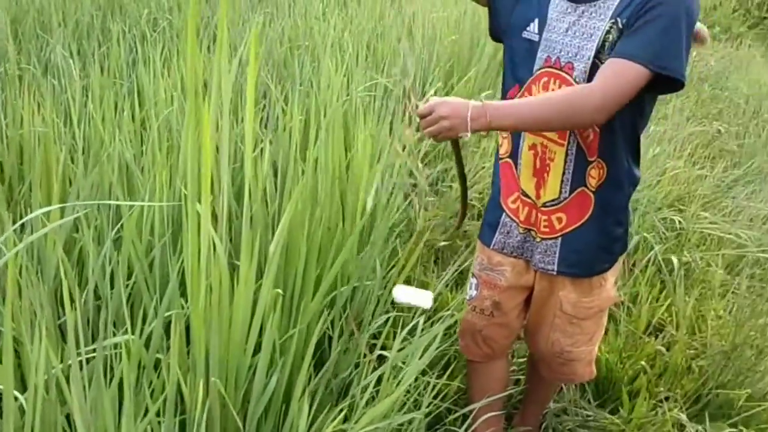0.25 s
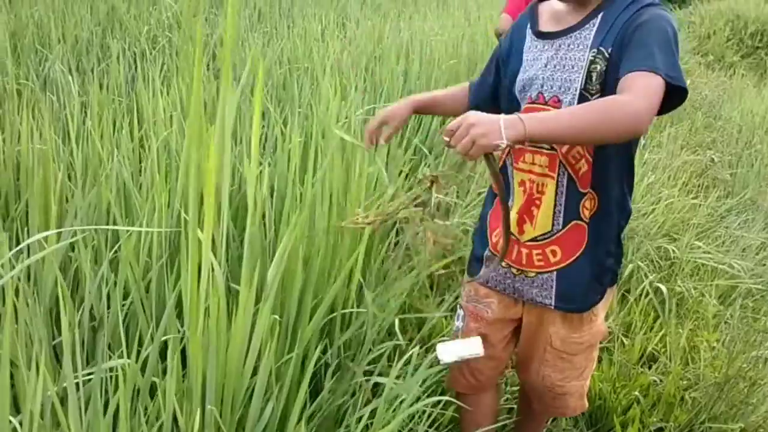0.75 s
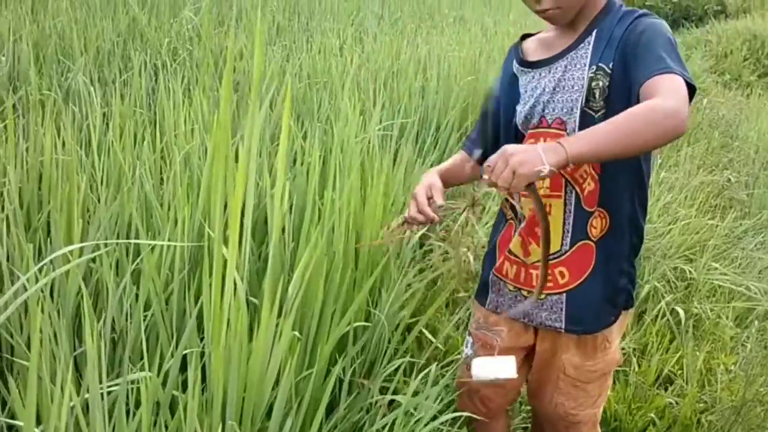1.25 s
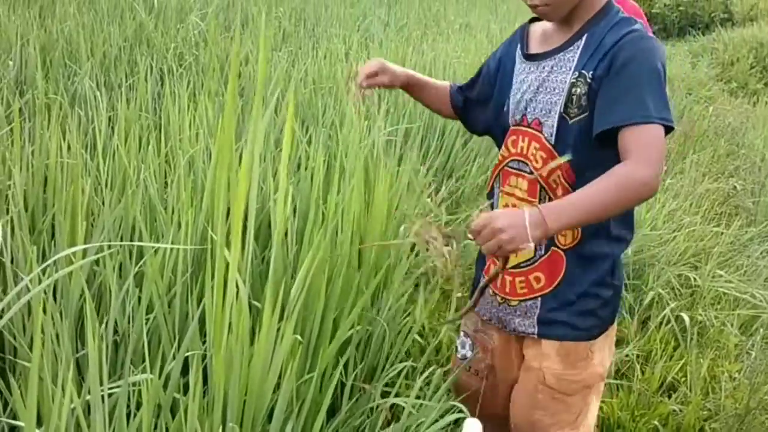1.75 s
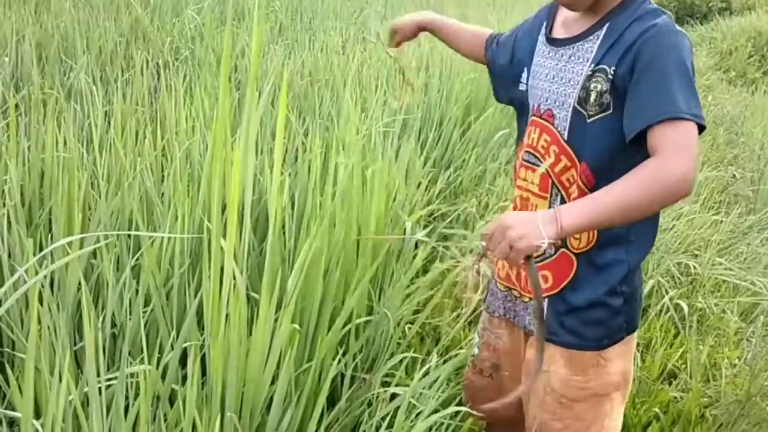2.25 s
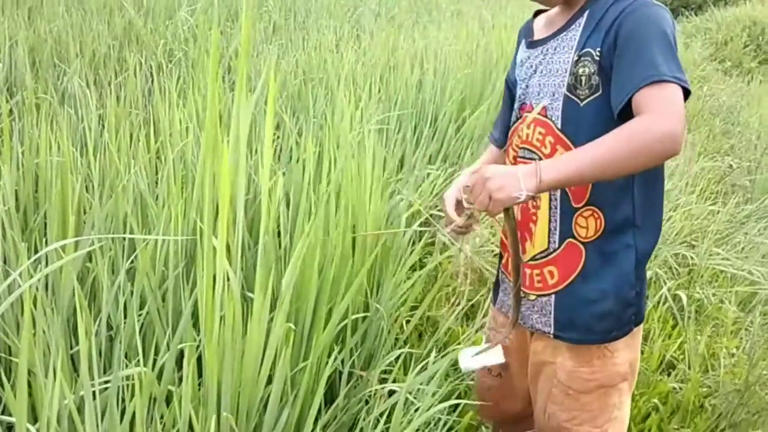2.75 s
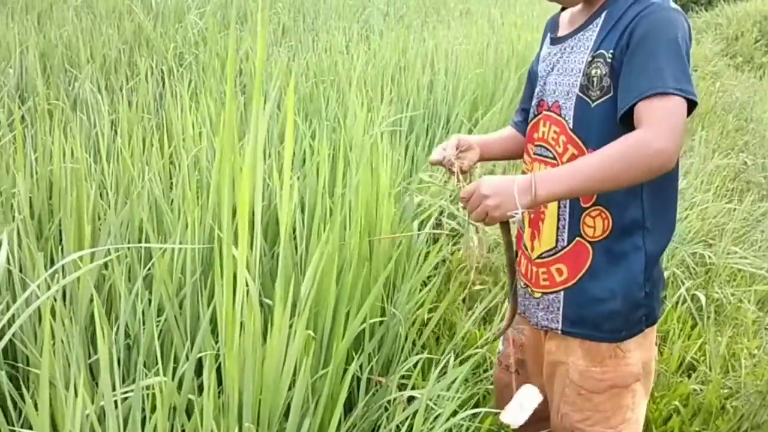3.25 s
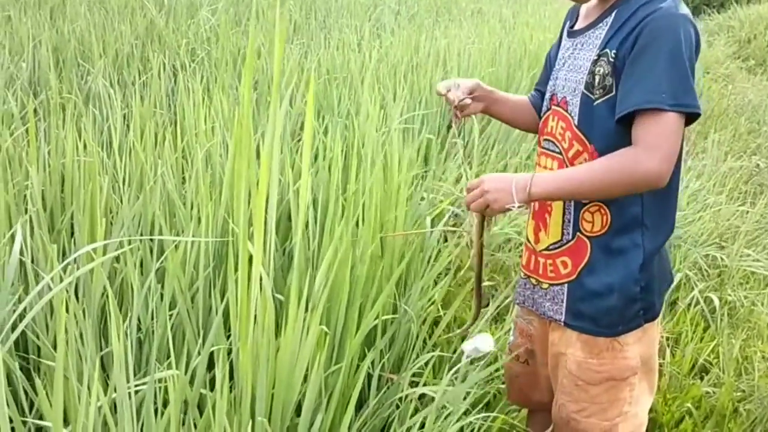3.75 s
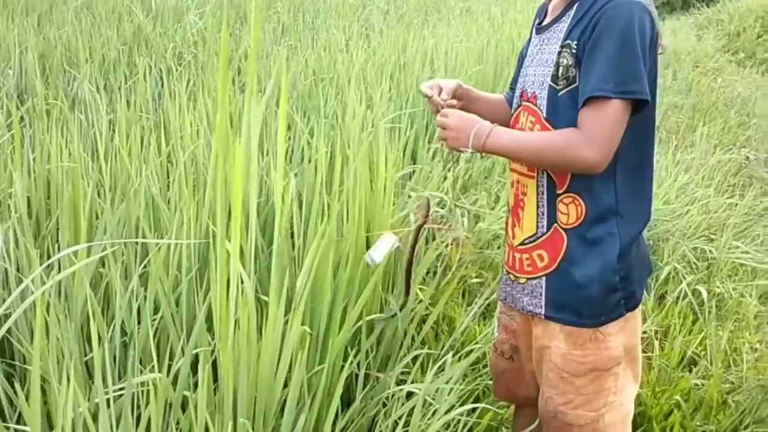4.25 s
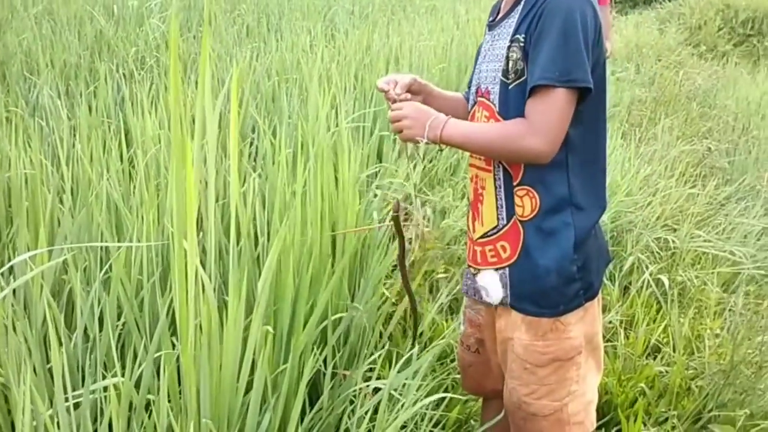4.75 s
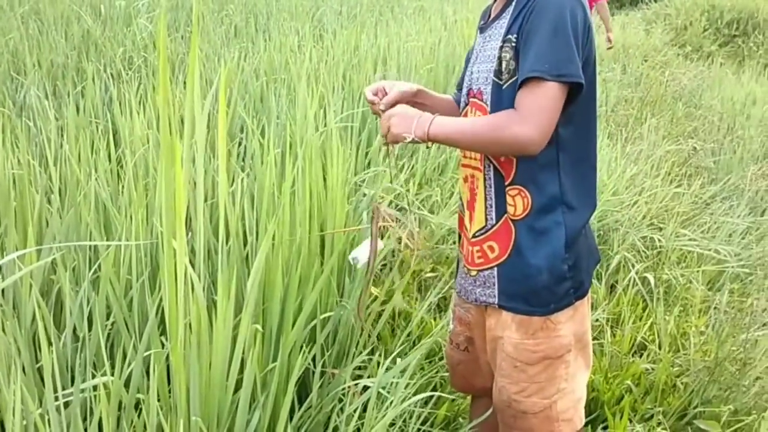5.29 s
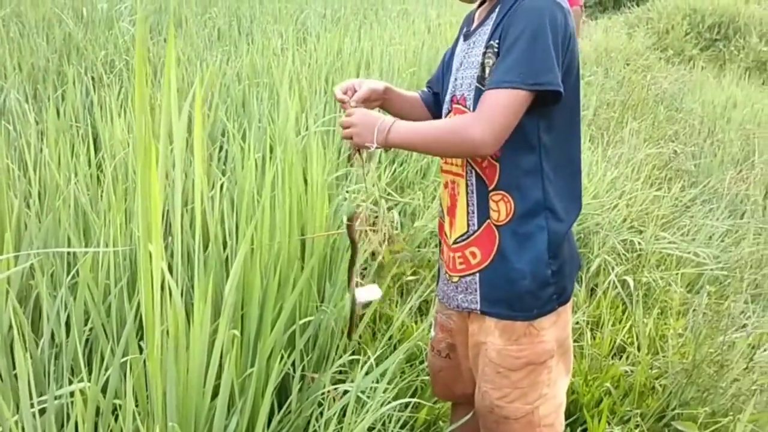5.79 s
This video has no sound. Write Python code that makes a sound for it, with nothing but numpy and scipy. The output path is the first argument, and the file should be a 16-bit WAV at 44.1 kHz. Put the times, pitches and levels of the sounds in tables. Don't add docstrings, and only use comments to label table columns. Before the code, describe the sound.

Throughout six seconds, an open grassy field rings with very high cicada whistles near 11 to 12 kilohertz, over weak tones near 3 kilohertz. Overlapping phrases of roughly a second sag slightly and renew, shimmering in level above a blurred far chorus. One katydid swells from the start into a dry buzz of about a hundred strokes a second, stopping near 3.4, then slowly rising again from 3.55. A brighter, stronger one buzzes from 0.5 to 1.45 and from 3.9 to 5.9. Faint crickets purr low and flutter. Hands softly brush grass around 0.5, 1.0 and 1.7, with the clearest swipe at 2.07, fading by 2.5. A quick warbler flicks at 2.85, repeats louder at 5.07, then gives a bent call until 5.4. Thin peeps, gradually lower, repeat from 4.9 onward. Quiet breeze, distant rumble and steady hiss lie beneath.

```python
import sys
import numpy as np
from scipy import signal
from scipy.fft import rfft, irfft, next_fast_len
from scipy.io import wavfile
from scipy.ndimage import uniform_filter1d, map_coordinates

SR = 44100
rng = np.random.default_rng(int(sys.argv[2]) if len(sys.argv) > 2 else 0)


def invert_db(x):
    u = np.asarray(x, float) / 20
    return 10 ** u


def wav_out(sig):
    wavfile.write(sys.argv[1], SR, np.round(np.clip(np.atleast_2d(sig).T, -1, 1) * 32767).astype(np.int16))


N = 265729
TIME = np.arange(N) / SR


def unit(x):
    return x / np.sqrt(np.mean(x ** 2) + 1e-20)


def curves(rows, t=TIME):
    s, *cols = np.transpose(rows)
    return [np.interp(t, s, c) for c in cols]


def wobble(rate, size=N):
    knots = rng.standard_normal(int(size * rate / SR) + 4)
    return map_coordinates(knots, [np.arange(size) * rate / SR])


def filtered(x, response):
    m = next_fast_len(N + 8192)
    return irfft(rfft(x, m) * response(np.fft.rfftfreq(m, 1 / SR)), m)[:N]


def noise(spectrum):
    f, db = np.transpose(spectrum)
    colour = lambda hz: invert_db(np.interp(np.log(hz + 1), np.log(f + 1), db))
    return unit(filtered(rng.standard_normal(N), colour))


def add(out, s, piece):
    part = out[round(s * SR):][:len(piece)]
    part += piece[:len(part)]


def whistle(hz, db):
    cycles = np.cumsum(hz) / SR + rng.random()
    return np.sqrt(2) * invert_db(db) * np.sin(2 * np.pi * cycles)


def echoes(x, wet_db, t60):
    t = np.arange(SR // 4) / SR
    tail = rng.standard_normal(len(t)) * invert_db(-60 * t / t60) * (t > .002)
    return x + invert_db(wet_db) * signal.fftconvolve(x, tail / np.linalg.norm(tail))[:N]


def cicadas(phrases, trim_db, flutter_db, waver_hz):
    out = np.zeros(N)
    for s, length, hz, sag_hz, early_db, late_db in phrases:
        u = np.linspace(0, 1, round(length * SR))
        swell_db = early_db + (late_db - early_db) * (2 * u - .5)
        swell_db = np.clip(swell_db, min(early_db, late_db) - 3, max(early_db, late_db) + 9.0)
        flutter = wobble(6.3, size=len(u)) + 0.87 * wobble(30.0, size=len(u))
        level_db = swell_db + trim_db + flutter_db * flutter
        nearest_end = np.minimum(u + (s < .05), 1 - u + (s + length > 6))
        fade = np.clip(nearest_end * length / 0.042, 0, 1)
        pitch_hz = hz - sag_hz * u + waver_hz * wobble(25.2, size=len(u))
        add(out, s, fade * whistle(pitch_hz, level_db))
    return out


def partial_phrases(singer, partial, db, swell_db):
    breath_s = .07
    first, period, hz, sag_hz, share = singer
    rows = []
    for start in np.arange(first, N / SR, period):
        s = max(start + breath_s, 0)
        end = start + share * period
        if end > s + .02:
            start_hz = partial * (hz - sag_hz * (s - start))
            fall_hz = partial * sag_hz * (end - s)
            rows.append((s, end - s, start_hz, fall_hz, db - swell_db, db + swell_db))
    return rows


def near_chorus():
    # first_start_s, phrase_period_s, start_hz, sag_hz_per_s, sung_share
    near_singers = [(-.246, .829, 2879.4, 25.3, .97), (-.652, 1.044, 2847.3, 16.5, .98),
                    (-.217, .768, 2840.9, 21.3, .95), (-.66, .808, 2901.4, 35, .68),
                    (-.468, 1.053, 2956.7, 20.8, .93), (-.637, .817, 2796.3, 22.1, .92),
                    (-.191, .832, 2959.1, 25.2, .82), (-.199, .84, 2916.2, 22, .7),
                    (-.137, .91, 2746.1, 26.6, .75), (-.243, .826, 3041.8, 24.4, .92),
                    (-.637, .962, 2779.8, 18.2, .7)]
    # fourth_partial_db, fourth_swell_db, fundamental_db, fundamental_swell_db (swell per phrase)
    voices = [(-52.5, 2, -71, -3), (-58.5, 0, -70, 0), (-56.5, -2.5, -70, -1), (-63, 3, -70, -2),
              (-68, -1, -70, -.5), (-64, -1, -82, -3), (-66, -1, -84, 0), (-70, -1, -88, 0),
              (-76, 2, -79.5, 0), (-73, 1, -90, 0), (-79, -2, -82, 0)]
    # time_s, fourth partials of the three nearest (gain_db x 3), all fundamentals gain_db
    shimmer = [(0, 8, 8, 1, 2), (.4, -3.5, -1, 2, -0.5), (.8, -1, 3, 0.5, -1.5), (1.2, 0.5, -1, 1, -.5),
               (1.7, 2, 7, 1.5, -1.5), (2.1, -3, 1, 1, -2), (2.5, 1, 0.1, 3, -1.5), (2.95, -3, 4, 7.5, 0.5),
               (3.3, -4, -7, 8, -0.5), (3.7, -3, -0.5, 2, 4), (4.2, -1, 0, -5, -1), (4.7, -9, 5, 1.5, 2),
               (5.1, 4, 5, -3, 1.5), (5.5, -7.5, 2, 1, -0.3), (6.03, 5, 1, -14, 2)]
    *fades, low_fade_db = curves(shimmer)
    fades = fades + [0] * len(near_singers)
    octave_db = -30
    octave = partial_phrases(near_singers[0], 2, voices[0][0] + octave_db, 0)
    out = cicadas(octave, trim_db=0, flutter_db=1.8, waver_hz=2)
    for singer, voice, fade_db in zip(near_singers, voices, fades):
        high_db, high_swell_db, low_db, low_swell_db = voice
        high = partial_phrases(singer, 4, high_db, high_swell_db)
        out = out + invert_db(fade_db) * cicadas(high, trim_db=0, flutter_db=2.5, waver_hz=2.5)
        low = partial_phrases(singer, 1, low_db, low_swell_db)
        out = out + invert_db(low_fade_db) * cicadas(low, trim_db=0, flutter_db=1.4, waver_hz=.8)
    return out


def far_chorus():
    # first_start_s, phrase_period_s, start_hz, level_db
    far_singers = [(-.063, .827, 12095, -77), (.1, .9, 11930, -73), (-.3, .8, 11700, -73),
                   (-.1, .87, 11050, -77), (.3, .76, 11270, -69)]
    # centre_hz, width_hz, level_db
    crowd_bands = [(11170, 160, -8), (11400, 300, 0), (11700, 300, -7), (12000, 400, -14),
                   (10940, 200, -14)]
    rows = []
    for first, period, hz, db in far_singers:
        for s in np.arange(first, 6, period):
            if s >= 0:
                rows.append((s, 1.1 * period, hz, 0.0066 * hz, db, db))

    def bands(f):
        return np.sqrt(sum(invert_db(2 * db) / (1 + (2 * (f - c) / w) ** 4) for c, w, db in crowd_bands))

    crowd = invert_db(-63 + 1.5 * wobble(3)) * unit(filtered(rng.standard_normal(N), bands))
    return crowd + cicadas(rows, trim_db=-1.5, flutter_db=2.2, waver_hz=3)


def strokes(song, duty, sweep, octave_db, scatter_db, rasp, lead=0.0, point=2):
    rate, hz, db = curves(song)
    begun = TIME >= song[0][0]
    turns = np.cumsum(rate * begun) / SR + lead
    number = turns.astype(int)
    u = (turns - number) / np.clip(duty, .05, 1)
    through = np.clip(u, 0, 1)
    size_db, bend, start = rng.standard_normal((number[-1] + 1, 3))[number].T
    shape = np.sin(np.pi * through ** 0.64) ** point * begun * (TIME <= song[-1][0])
    chirp_hz = hz * (1 + sweep * (.4 - through) + .006 * bend)
    phase = 2 * np.pi * np.cumsum(chirp_hz) / SR + 2 * start
    rough = 1 + rasp * wobble(900)
    tone = np.sin(phase) + invert_db(octave_db) * np.sin(2 * phase)
    return shape * rough * tone * invert_db(db + scatter_db * size_db) * 2 / np.sqrt(duty)


def pitched(song, hz, at_db, hz_per_db):
    return [(s, rate, hz + hz_per_db * (db - at_db), db) for s, rate, db in song]


def katydids():
    # time_s, strokes_per_s, level_db
    left_song = [
        [(-.1, 106, -63.5), (.3, 99, -55.5), (.6, 105, -54), (1.0, 102, -52), (1.5, 103, -52), (2.5, 100, -53),
         (3.424, 96.5, -52.5)],
        [(3.55, 99, -62.5), (3.8, 110, -59), (4.2, 102, -58), (4.7, 99.3, -55.5), (5.7, 98.8, -50.5),
         (6.1, 103, -54.5)],
    ]
    right_song = [
        [(.48, 103.7, -60), (.72, 102.4, -50), (.78, 104.6, -47.5), (1.2, 103, -47), (1.455, 101.3, -46.5)],
        [(3.9, 102, -61), (3.96, 101.5, -52.5), (4.11, 103.4, -52.5), (4.15, 104.3, -47), (5.0, 102.5, -46.5),
         (5.88, 102, -47.5)],
    ]
    left_octaves_db = (-4, -7)
    left = sum(strokes(pitched(song, 7672, at_db=-53.5, hz_per_db=13), duty=.68, sweep=.16, octave_db=db,
                       scatter_db=-0.04, rasp=0.077, lead=.68, point=1.43)
               for song, db in zip(left_song, left_octaves_db))
    right = sum(strokes(pitched(song, 8228, at_db=-47, hz_per_db=30), duty=.62, sweep=.06, octave_db=-24,
                        scatter_db=1.1, rasp=.1, lead=.65, point=1.7)
                for song in right_song)
    return echoes(left, wet_db=-9, t60=.05) + echoes(right, wet_db=-11, t60=0.045)


def steady(rate, hz, db):
    return [(0, rate, hz, db), (6.1, rate, hz, db)]


def crickets():
    # time_s, level_db
    purr_levels = [(0, -63), (.8, -70.5), (1.3, -65.5), (1.6, -67.5), (2.1, -62), (2.8, -67), (3.5, -62),
                   (4.3, -68), (5.2, -61), (6.1, -66)]
    # time_s, level_db
    buzz_levels = [(0, -67), (1.5, -69), (3, -68), (4.7, -66), (5.1, -69), (6.1, -71)]
    purr_db, = curves(purr_levels)
    purr = sum(strokes(steady(*voice), duty=.7, sweep=.17, octave_db=-40, scatter_db=1.5,
                       rasp=.1, lead=.1, point=1.3)
               for voice in [(25.62, 3330, 0), (26.25, 3370, -7), (17.0, 3280, -4)])  # strokes/s, Hz, dB
    buzz_db, = curves(buzz_levels)
    bursts = np.clip(.35 + 1.5 * np.sin(2 * np.pi * (8.5 * TIME + .01)), .2, 1)
    buzz = strokes(steady(95, 6620, 0), duty=.9, sweep=.03, octave_db=-40, scatter_db=2.5, rasp=.15, point=1.2)
    both = invert_db(purr_db - 5) * purr + invert_db(buzz_db + 2.5) * bursts * buzz
    return echoes(both, wet_db=-5, t60=.08)


def birds():
    # start_s, pitch_factor, level_db
    figures = [
        (2.854, .975, -51),
        (5.068, .99, -45.5),
    ]
    # time_from_figure_start_s, pitch_hz, level_db
    humps = [(0, 4300, -20), (.012, 6200, -3), (.023, 6900, -7), (.031, 6500, -5), (.035, 5700, -6),
             (.042, 5800, -5), (.047, 6750, -7), (.054, 6200, -9), (.061, 4400, -22)]
    flick = [(.07, 4500, -26), (.073, 5050, -9), (.077, 5150, -9), (.083, 4300, -20), (.086, 5700, -12),
             (.09, 5000, -9), (.099, 3400, -14)]
    # time_s, pitch_hz, level_db
    kinked_fall = [(5.258, 7100, -73), (5.268, 6880, -56), (5.279, 6100, -52), (5.286, 6700, -54),
                   (5.294, 6300, -51), (5.301, 5500, -51), (5.305, 5430, -70)]
    final_dip = [(5.308, 6300, -66), (5.318, 6000, -51), (5.331, 5680, -48.5), (5.345, 5530, -54),
                 (5.36, 5720, -50.5), (5.372, 6000, -53), (5.382, 6440, -54), (5.39, 6600, -80)]
    # start_s, length_s, top_hz, level_db
    peeps = [
        (4.905, .062, 6650, -65),
        (5.03, .07, 6600, -61),
        (5.16, .07, 6420, -63),
        (5.298, .07, 6400, -69),
        (5.435, .074, 6310, -60.5),
        (5.578, .082, 6250, -60),
        (5.735, .072, 6160, -62),
        (5.893, .078, 6140, -66),
    ]
    # share_of_length, pitch_factor, level_db
    peep_arch = [(0, .92, -16), (.08, .968, -5), (.3, .985, 0), (.7, 1.0, 0), (.88, .99, -2),
                 (1.0, .87, -12)]
    out = np.zeros(N)
    notes = [(note, s, factor, db) for s, factor, db in figures for note in (humps, flick)]
    notes += [(kinked_fall, 0, 1, 0), (final_dip, 0, 1, 0)]
    for note, s, factor, db in notes:
        hz, shape_db = curves(note, np.arange(note[0][0], note[-1][0], 1 / SR))
        add(out, s + note[0][0], whistle(factor * uniform_filter1d(hz, size=70), db + shape_db))
    for s, length, hz, db in peeps:
        factor, shape_db = curves(peep_arch, np.linspace(0, 1, round(length * SR)))
        add(out, s, whistle(hz * uniform_filter1d(factor, size=200), db + shape_db))
    return echoes(out, wet_db=-6, t60=.15)


def grass():
    # centre_s, level_db, half_length_s
    brushes = [
        (.47, -61.5, .14),
        (1.0, -64.5, .35),
        (1.65, -64, .2),
        (1.9, -62.5, .08),
        (2.065, -55.5, .045),
        (2.14, -59.5, .05),
        (2.38, -65, .1),
    ]
    # freq_hz, density_db_per_hz
    blade_colour = [(500, -24), (1200, 2), (3000, 4.5), (6000, -9.5), (10000, 0.5), (14000, 4),
                    (17000, -17.5)]
    still_db = -77
    power = sum(invert_db(2 * db) * np.exp(-((TIME - s) / half) ** 2) for s, db, half in brushes)
    rustle = invert_db(still_db) + np.sqrt(power)
    clumps = invert_db(1.3 * wobble(35) + 3 * wobble(300))
    return rustle * unit(clumps * noise(blade_colour))


def open_air():
    # freq_hz, density_db_per_hz
    rumble_colour = [(3, -2), (8, 2.5), (20, -7.5), (40, -11), (65, -12), (88, -7.5), (120, -10.5),
                     (260, -16), (400, -14), (500, -18), (600, -21), (1000, -19.5), (2600, -21.5),
                     (3400, -51), (5700, -120)]
    # freq_hz, density_db_per_hz
    hiss_colour = [(2000, -58), (2800, 5.5), (3700, -5), (4500, -1), (5300, -9), (6200, 1), (6900, 2),
                   (7500, 10.5), (8600, 4), (9500, -5), (10500, -1.5), (13000, -4), (14000, -5),
                   (15200, -5), (17000, 0.5)]
    breeze_colour = [(3, -7), (15, -12), (35, -24), (70, -27), (200, -120)]  # Hz, dB per Hz
    gusts = invert_db(-65.5 + 3.0 * wobble(2.3)) * noise(breeze_colour)
    rumble = invert_db(-58.0 + 0.89 * wobble(1.434)) * noise(rumble_colour)
    hiss = invert_db(-55.0 + 0.13 * wobble(0.67)) * noise(hiss_colour)
    return gusts + rumble + hiss


def scene():
    insects = near_chorus() + far_chorus() + katydids() + crickets()
    return (insects + birds() + grass() + open_air())[None]


def roll_off(x):
    return signal.sosfilt(signal.butter(12, 16750, fs=SR, output="sos"), x)


def record(dry):
    top_hz = 15540
    mix = filtered(dry[0], lambda hz: hz < top_hz)[None]
    return roll_off(mix)


dry = scene()
out = record(dry)
wav_out(out)
```